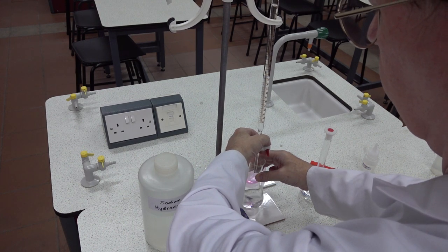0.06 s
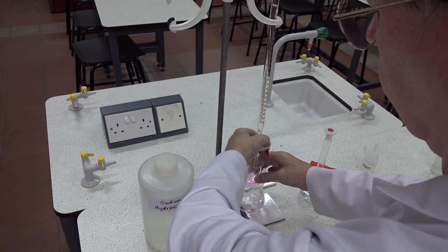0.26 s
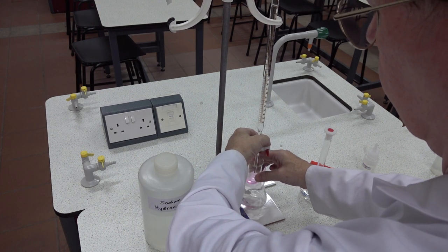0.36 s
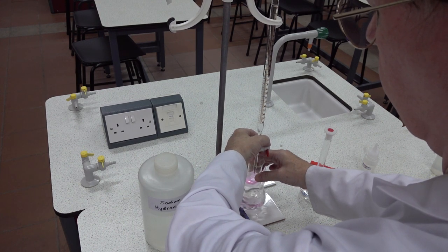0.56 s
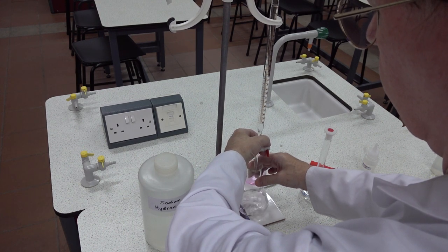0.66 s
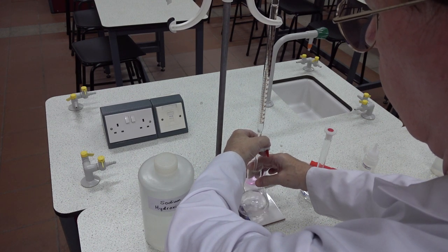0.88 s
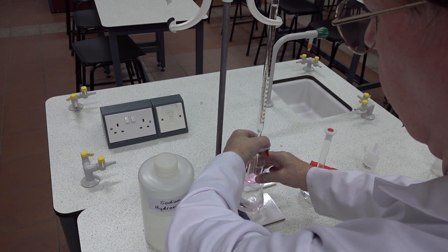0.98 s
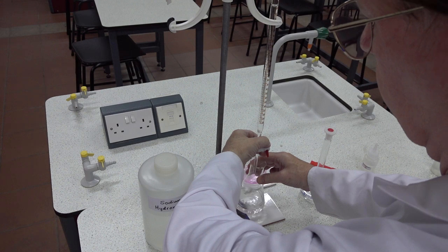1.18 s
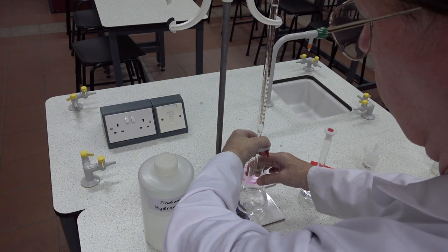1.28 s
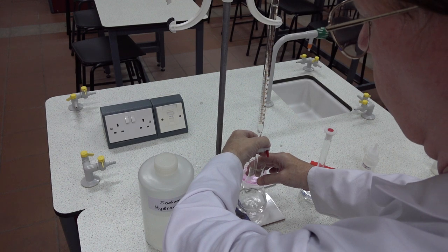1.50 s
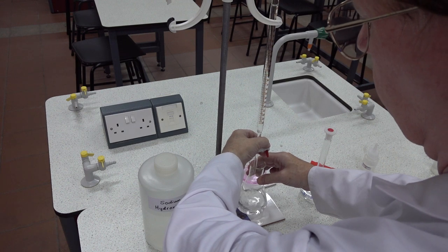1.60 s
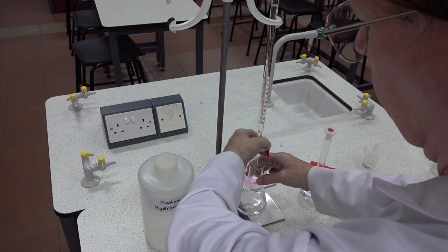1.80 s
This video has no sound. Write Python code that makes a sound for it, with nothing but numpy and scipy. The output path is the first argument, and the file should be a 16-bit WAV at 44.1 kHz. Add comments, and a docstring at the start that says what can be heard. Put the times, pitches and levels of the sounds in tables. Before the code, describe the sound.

Close mono pickup of a glass flask striking a tile on a bench: one loud bright knock, a tiny clink against a glass tube, a gentler rattly set-down, room echo and steady air hum.

```python
"""A glass conical flask knocks hard on a tile, then is set down again more softly, in a bare laboratory.
Each knock is a coloured impulse plus a noise rattle through tile and bench resonances, with decaying
glass modes and a bench boom. Two light touches on a burette tip are short rings with a noise scrape.
Noise tails give about a second of room; coloured noise and hum lines make the ventilation.
A fast limiter holds the highest peaks at full scale."""
import sys
import numpy as np
from scipy import signal
from scipy.fft import rfft, irfft, next_fast_len
from scipy.io import wavfile
from scipy.ndimage import uniform_filter1d, minimum_filter1d

SR = 44100
rng = np.random.default_rng(int(sys.argv[2]) if len(sys.argv) > 2 else 0)


def file_out(sig):
    """Save sig as 16-bit WAV at sys.argv[1]."""
    # one column per channel
    cols = np.atleast_2d(sig).T
    # limit, then scale
    lim = np.clip(cols, -1, 1)
    pcm = np.round(lim * 32767).astype(np.int16)
    wavfile.write(sys.argv[1], SR, pcm)


N = 81585

# flask on tile, hard then soft: t/s, blow/dB, rattle/dB, rattle t60/s, room/dB, room gap/s, boom/dB
KNOCKS = [(0.2064, 26, 2, 0.033, 5, .006, -34.5), (1.1237, 24.5, -0.5, 0.17, -2, .002, -39)]


def amp(db):
    """Amplitude ratio of a level in dB."""
    return 10 ** (np.asarray(db) / 20)


def unit(x):
    """x scaled to unit rms."""
    return x / np.sqrt(np.mean(x ** 2) + 1e-20)


def clock():
    """Sample times in s."""
    return np.arange(N) / SR


def along(points, hz):
    """Interpolate (f/Hz, value) points on a log frequency axis."""
    f, v = np.transpose(points)
    return np.interp(np.log(hz + 1), np.log(f + 1), v)


def fade(t, t60):
    """Exponential decay by 60 dB in t60 seconds."""
    return np.exp(-np.log(1000) * t / t60)


def delayed(x, lag_s):
    """x later by lag_s, cut to N samples."""
    return np.pad(x, (max(round(lag_s * SR), 0), 0))[:N]


def coloured(x, points):
    """x through a minimum-phase filter with the given (f/Hz, level/dB) shape."""
    m = 2 * next_fast_len(N)
    log_gain = np.log(amp(along(points, np.fft.rfftfreq(m, 1 / SR))))
    cepstrum = irfft(log_gain, m)
    # fold onto positive time: causal response
    cepstrum[1:m // 2] *= 2
    cepstrum[m // 2 + 1:] = 0
    return irfft(rfft(x, m) * np.exp(rfft(cepstrum)), m)[:N]


def evened(x, size):
    """x with its spectrum levelled to unit power over a sliding band of size bins."""
    z = rfft(x, 2 * N)
    power = np.abs(uniform_filter1d(np.abs(z) ** 2, size))
    return irfft(z / np.sqrt(power + 1e-12))[:N]


def ring(modes, rise_s):
    """Sum of damped sines from (f/Hz, t60/s, level/dB) rows, random phase, soft onset."""
    t = clock()
    waves = np.zeros(N)
    for hz, t60, db in modes:
        waves += amp(db) * fade(t, t60) * np.sin(2 * np.pi * (hz * t + rng.random()))
    return waves * (1 - np.exp(-t / rise_s))


def knocks():
    """Base on tile: an impulsive blow and a brief rattle excite bench, glass and room."""
    # contact colour: f/Hz, hard/dB, soft/dB
    contact = [(39.7, -21, -22), (133, -11, -13.5), (273, -4, -3), (496, -4, -4), (726, -3.5, -4),
               (1230, -2, -4.5), (1660, -2.5, -8), (2300, -6, -8.5), (2500, -3, -7), (3700, -9.5, -25.5),
               (4220, -8.5, -26), (6210, -19, -32.5), (7580, -31, -53), (11000, -42.5, -50),
               (16000, -58, -62)]
    # near-surface echoes: delay/s, level/dB
    walls = [(.0022, -9), (.0052, -10), (.0112, -11)]
    t, out = clock(), np.zeros(N)
    for k, (start_s, blow_db, rattle_db, rattle_t60, room_db, gap_s, boom_db) in enumerate(KNOCKS):
        colour = [(hz, levels[k] + blow_db) for hz, *levels in contact]
        blow = bench(dispersed(coloured(signal.unit_impulse(N), colour)), index=k)
        chatter = evened(rng.standard_normal(N) * fade(t, rattle_t60), size=400)
        rattle = bench(coloured(chatter, colour), index=k)
        body = glass(index=k)
        early = sum(amp(db) * delayed(blow, lag_s) for lag_s, db in walls)
        tail = amp(room_db) * delayed(room(blow + body), gap_s)
        knock = blow + amp(rattle_db) * rattle + body + early + tail + amp(boom_db) * boom()
        out += delayed(knock, start_s)
    return out


def hard_edge():
    """Extra snap of the hard knock: a dispersed impulse, strongest in the treble."""
    # edge colour: f/Hz, level/dB
    snap = [(300, -21), (2000, -3), (3500, 4), (5500, -9), (6800, -7), (7900, 5), (9500, -9), (12500, -20),
            (16000, -42)]
    snap_db = 14.5
    edge = dispersed(coloured(signal.unit_impulse(N), snap))
    return delayed(amp(snap_db) * edge, KNOCKS[0][0])


def glass(index):
    """Flask ring for one contact; each mode beats with a weaker twin on either side."""
    # flask modes: f/Hz, t60/s, hard/dB, soft/dB, neck touch/dB
    flask = [(2046, .12, -31, -43, -60), (2536, .08, -26, -35, -65), (2882, .2, -33, -45, -65),
             (3360, .14, -32, -36, -39), (3460, .3, -44, -38, -55), (4100, .15, -31, -65, -54),
             (4465, .3, -29, -49, -43), (5103, .1, -42, -50, -52), (5706, .25, -39, -54, -46),
             (5790, .25, -44, -42, -50), (7585, .25, -54, -72, -68), (8200, .25, -44, -60, -63),
             (9400, .2, -57, -72, -65), (10605, .18, -47, -69, -65), (12500, .15, -57, -76, -68),
             (13150, .15, -62, -80, -70), (13950, .15, -62, -80, -70)]
    rise_s, split_ratio, twin_db = 0.00067, 0.00386, -5.5  # split: mean twin offset over mode pitch
    modes = [(hz, t60, levels[index]) for hz, t60, *levels in flask]
    twins = []
    for hz, t60, db in modes:
        for side in (-1, 1):
            twin_hz = hz * (1 + side * split_ratio * (.5 + rng.random()))
            twins.append((twin_hz, t60, db + twin_db))
    return ring(modes + twins, rise_s)


def dispersed(x):
    """Bending waves in the tile: the bass arrives later than the treble."""
    bass_lag_s, half_lag_hz = 0.00137, 608
    hz = np.fft.rfftfreq(2 * N, 1 / SR)
    lag_s = bass_lag_s / (1 + hz / half_lag_hz)
    phase = 2 * np.pi * np.cumsum(lag_s) * hz[1]  # integrated group delay
    return irfft(rfft(x, 2 * N) * np.exp(-1j * phase))[:N]


def bench(x, index):
    """x plus second-order resonances of tile and bench, for one knock."""
    # tile and bench modes: f/Hz, width/Hz, hard gain/dB, soft gain/dB
    resonances = [(180, 20, 0, -12), (255, 35, 4, -6), (310, 50, -8, 6), (398, 16, 4, -8),
                  (611, 16, -20, 9), (668, 25, -20, 1), (778, 20, 0, -20), (858, 35, 3, -10),
                  (1050, 55, 4, -4), (1150, 40, -20, -2), (1243, 28, 5, -1), (1382, 22, -20, 3),
                  (1428, 22, 0, -20), (1545, 75, -3, 5), (1665, 40, -1, -20)]
    f = np.fft.rfftfreq(2 * N, 1 / SR)
    peaks = 0
    for hz, width_hz, *gains in resonances:
        damping = 1j * f * width_hz
        peaks = peaks + amp(gains[index]) * damping / (hz * hz - f * f + damping)
    return irfft(rfft(x, 2 * N) * (1 + peaks))[:N]


def boom():
    """Bench frame: low coloured noise that swells and fades after a knock."""
    # frame colour: f/Hz, level/dB
    frame = [(30, -32), (70, -7), (110, -3), (180, -4), (260, -22.5), (600, -57)]
    peak_s = 0.085
    u = clock() / peak_s
    return unit(coloured(rng.standard_normal(N), frame)) * u * np.exp(1 - u)


def touches():
    """Neck grazes the burette tip: tip, tube and flask modes ring under a noise scrape."""
    # light touches: t/s, level/dB, room/dB, tube ping/dB
    grazes = [(0.1827, -1, -1, -42), (0.734, -16, 2, -21.5)]
    # burette tip modes: f/Hz, t60/s, level/dB
    tip = [(3230, 0.019, -28), (4500, 0.033, -22), (11800, 0.017, -34)]
    rise_s, scrape_db, scrape_t60 = 0.0013, -36.5, 0.027
    tube_hz, tube_t60 = 1993, 0.062
    out = np.zeros(N)
    for start_s, db, room_db, ping_db in grazes:
        scrape = amp(scrape_db) * rng.standard_normal(N) * fade(clock(), scrape_t60)
        burette = ring([*tip, (tube_hz, tube_t60, ping_db)], rise_s)
        tick = burette + glass(index=2) + scrape
        out += amp(db) * delayed(tick + amp(room_db) * room(tick), start_s)
    return out


def room(x):
    """Convolve x with a fresh diffuse noise tail: quick build-up, frequency-dependent decay."""
    # reverberation: f/Hz, t60/s
    decay = [(80, 0.68), (250, 1.29), (600, 0.91), (1300, 1.03), (2700, 1.103), (4200, 0.98), (6000, .8),
             (9000, 0.49), (15000, 0.32)]
    build_s = 0.0093
    hz, t, z = signal.stft(rng.standard_normal(N), SR, nperseg=256)
    tail = signal.istft(z * fade(t, along(decay, hz)[:, None]), SR, nperseg=256)[1][:N]
    tail = evened(tail * (1 - np.exp(-clock() / build_s)), size=160)
    return signal.fftconvolve(x, tail)[:N]


def ventilation():
    """Steady rumble and hiss from coloured noise, with a few faint hum sines."""
    # rumble and hiss colour: f/Hz, level/dB
    air = [(12, -39), (20, -5.5), (50, 3), (81, -8), (177, -10), (262, -14), (301, -15.5), (485, -20),
           (607, -20.5), (780, -22), (976, -25), (1330, -26.5), (2820, -34.5), (3070, -35.5),
           (16000, -46.5)]
    # hum lines: f/Hz, rms level/dB
    hum_lines = [(47, -53), (100, -50), (339, -63.5), (479, -61)]
    air_db = -39  # rms
    hum = np.zeros(N)
    for hz, db in hum_lines:
        hum += amp(db) * np.sqrt(2) * np.sin(2 * np.pi * (hz * clock() + rng.random()))
    return amp(air_db) * unit(coloured(rng.standard_normal(N), air)) + hum


def scene():
    """Mono sum of all layers."""
    return (knocks() + hard_edge() + touches() + ventilation())[None]


def record(dry):
    """Fast limiter at full scale, then a brick-wall low-pass."""
    ceiling, limit_s, top_hz = 1.0, .0006, 16000
    size = int(limit_s * SR)
    needed = np.minimum(1, ceiling / (np.abs(dry) + 1e-9))
    held = dry * uniform_filter1d(minimum_filter1d(needed, size), size)
    passed = np.fft.rfftfreq(2 * N, 1 / SR) < top_hz
    return irfft(rfft(held, 2 * N) * passed)[:, :N]


dry = scene()
out = record(dry)
file_out(out)
```